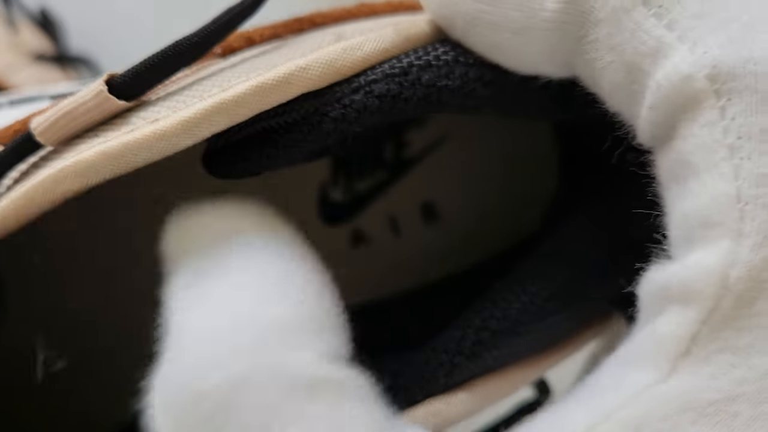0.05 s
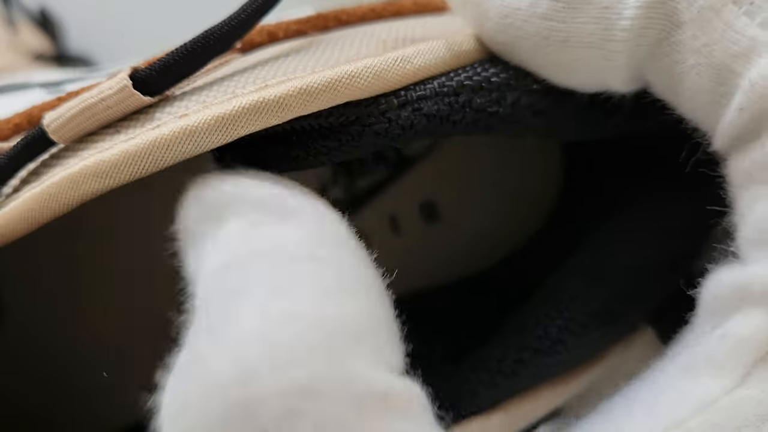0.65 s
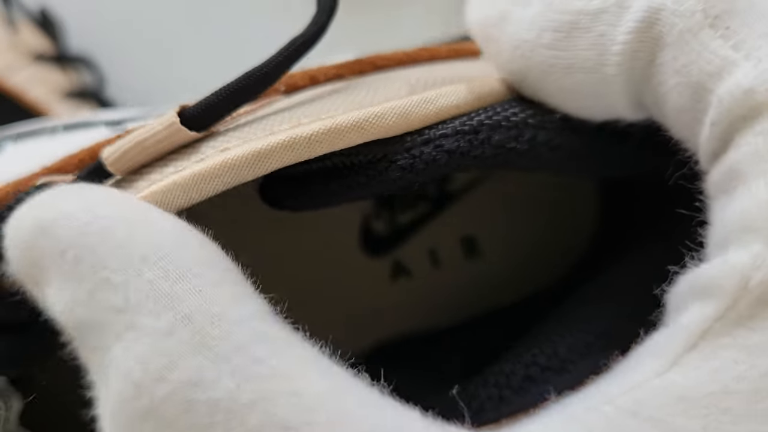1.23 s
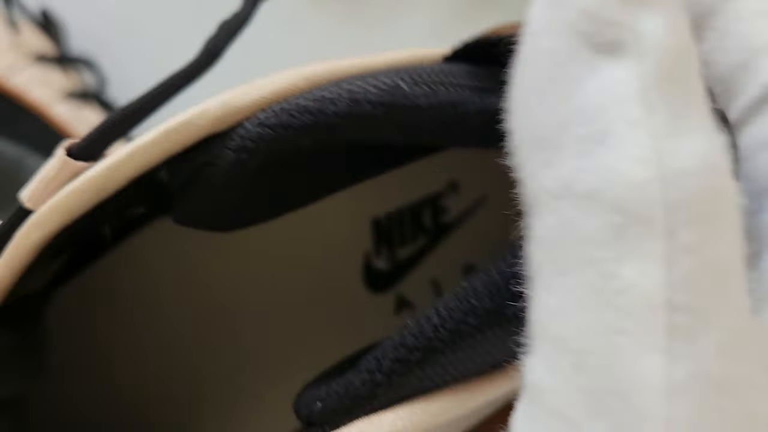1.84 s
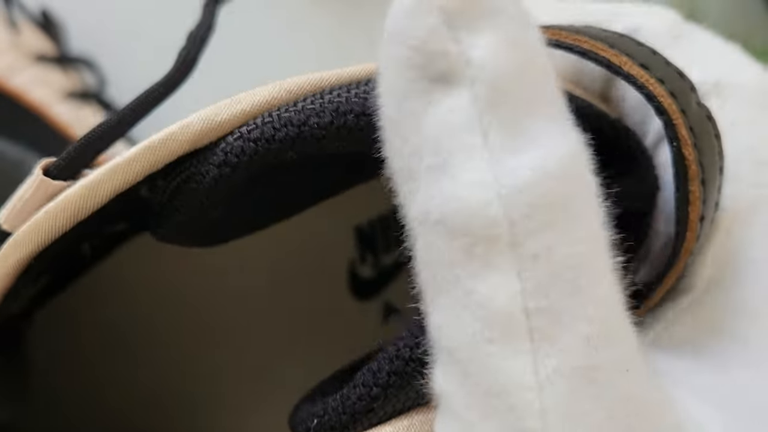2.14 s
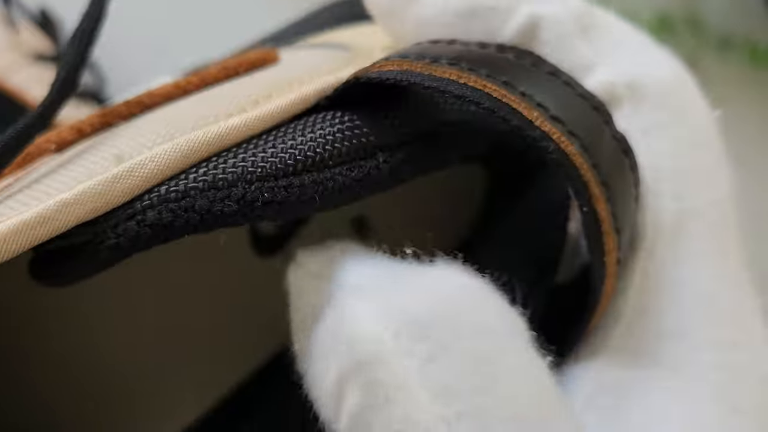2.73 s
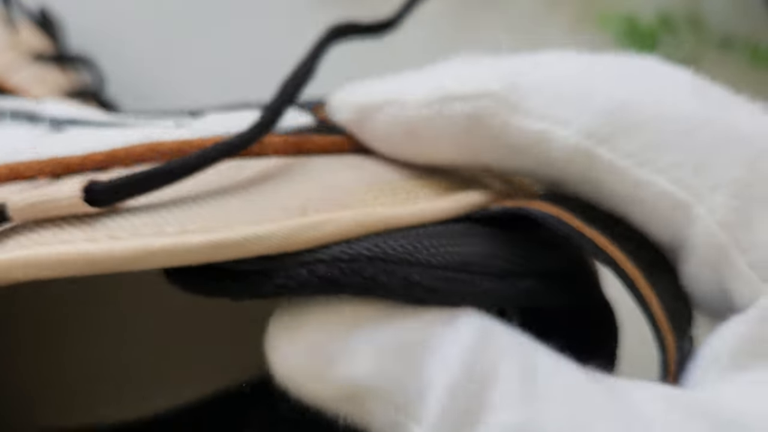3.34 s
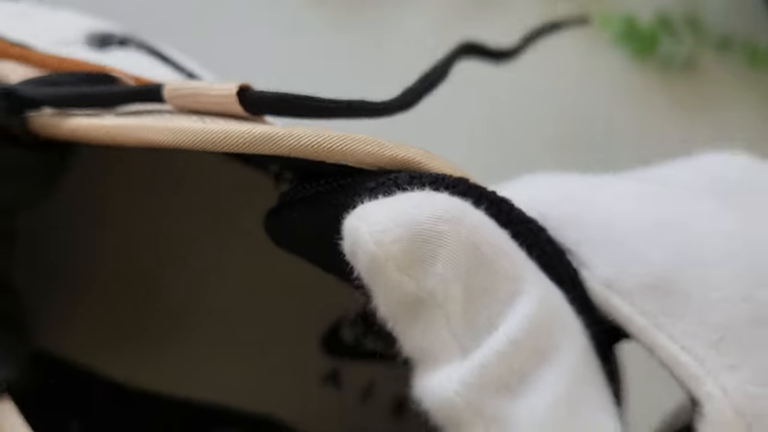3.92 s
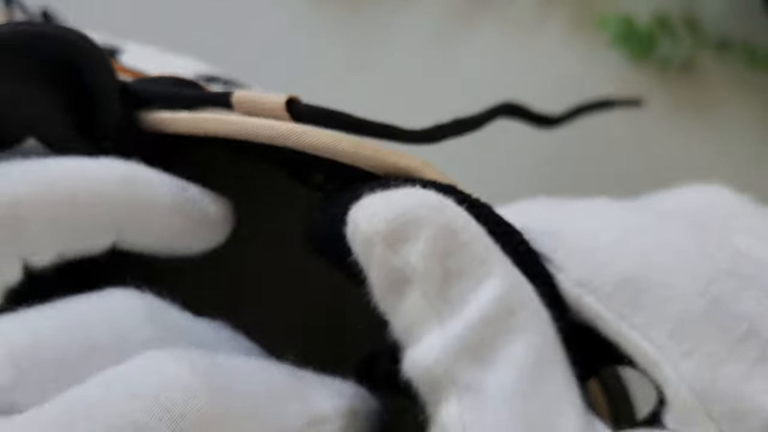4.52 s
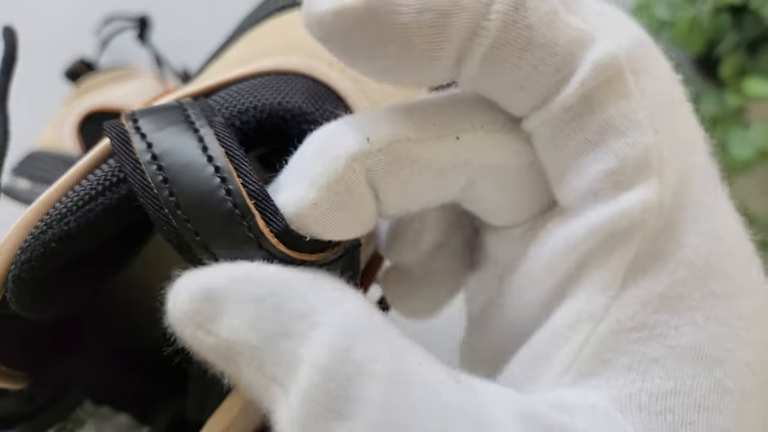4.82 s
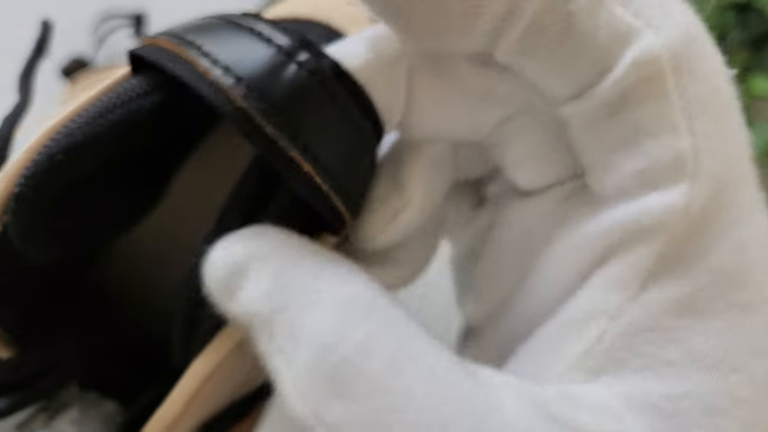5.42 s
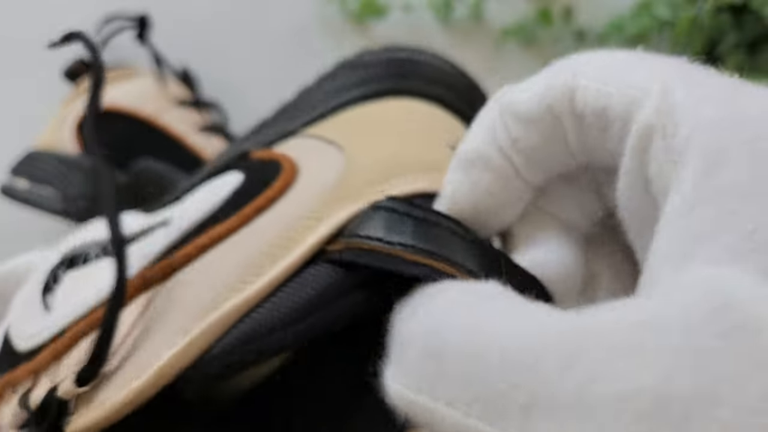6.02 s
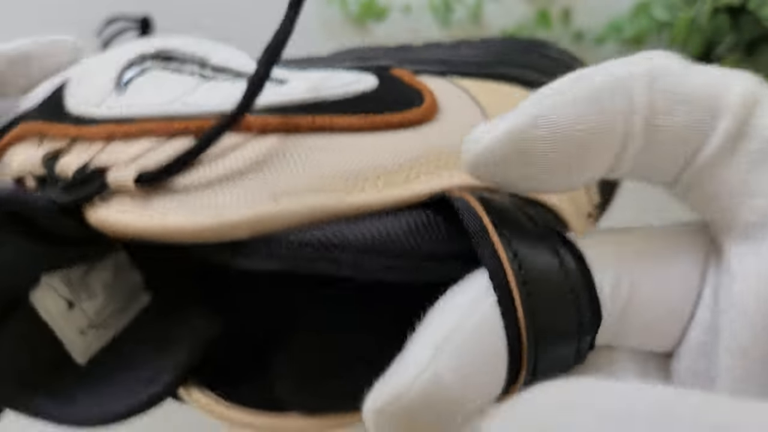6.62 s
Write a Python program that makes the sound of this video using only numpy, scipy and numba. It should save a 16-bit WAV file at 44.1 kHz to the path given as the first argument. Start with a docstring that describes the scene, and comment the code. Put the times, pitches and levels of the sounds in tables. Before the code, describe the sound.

Cotton gloves handle a sneaker close to the microphone in a small quiet room. At about 0.1, 0.7 and 1.1 seconds the thumb flicks the collar, each time a quick cloth swish with a short hollow knock; these are the loudest sounds. From 1.4 seconds the glove softly rubs the padded lining, with tiny creaks around 1.6 and brief brushing strokes around 2. A soft low thump comes at 1.9, and lighter swishing knocks at 2.8 and 3.2 seconds. From 3.6 to 4.5 seconds the rubbing is more continuous, with little runs of stick-slip creaking, ending in one more flick and knock at 4.6. From 4.9 to about 6.7 seconds faint, short strokes brush the outer fabric and heel loop, the last a little stronger. Everything sits slightly to the left, over a faint, steady low room noise.

```python
"""Cotton gloves handle a sneaker, close up, in a quiet room.
0-1.1 s: the thumb flicks the collar three times; the shoe knocks hollowly.
1.4-3.5 s: the glove rubs the padded lining and creaks in small slips; more knocks, brief strokes.
3.6-4.6 s: longer rubbing and stick-slip creaking, then a last flick.
4.9-6.7 s: short strokes brush the outer fabric and the heel loop."""
import sys
import numpy as np
from scipy import signal
from scipy.fft import rfft, irfft
from scipy.io import wavfile
from scipy.ndimage import uniform_filter1d
from numba import njit

SR = 44100
rng = np.random.default_rng(int(sys.argv[2]) if len(sys.argv) > 2 else 0)


def inscribe(sig):
    """Save sig as 16-bit PCM at rate SR to the path in sys.argv[1].

    A 1-D sig is mono; a 2-D sig holds one channel per row.
    Samples are clipped to [-1, 1] before scaling.
    """
    pcm = np.round(np.clip(np.atleast_2d(sig).T, -1, 1) * 32767)
    wavfile.write(sys.argv[1], SR, pcm.astype(np.int16))


N = 293706
T = np.arange(N) / SR

# thumb flicks: t/s, hollow/dB, wall f/Hz, wall/dB, sole f/Hz, sole/dB, damping factor, room send/dB
THUMB_FLICKS = [(0.1329, -20.5, 207, -12, 126, -52, 1.11, -9), (.658, -18, 197, -9, 111, -19.5, 1.16, -8.5),
                (1.0816, -15, 223, -19, 90, -21.5, 0.93, -6.5),
                (1.9021, -64.5, 217, -33, 69.6, -29.5, 0.84, -6),
                (2.8325, -27, 287, -26, 101, -22, 1.3, -8.5), (3.2323, -33.5, 301, -29, 83, -25.5, 0.7, -5),
                (4.6066, -27.5, 167, -25.5, 146, -40, 2.07, -40.5),
                (4.6136, -23, 190, -49, 142, -61, 3.2, -45.5)]
# cloth whipping off an edge: t/s, level/dB
EDGE_SWISHES = [(0.134, -44.5), (.5, -67), (0.656, -39), (1.08, -43), (1.325, -70), (1.906, -64),
                (2.827, -38.5), (3.042, -61), (3.227, -43), (4.609, -46.5)]
# runs of slips on the padding: start/s, length/s, slip peak/dB
CREAK_RUNS = [(1.417, .045, -54), (1.594, .006, -44.5), (1.633, .015, -40), (2.134, .006, -45.5),
              (3.628, .015, -49), (3.747, .025, -43.5), (3.802, .006, -44), (3.823, .036, -41.5),
              (3.898, .006, -49.5), (3.928, .006, -48), (4.07, .025, -46.5), (4.121, .006, -44),
              (4.167, .046, -52), (4.27, .025, -47), (4.731, .006, -55.5)]
# drags over the lining: start/s, end/s, hiss/dB, hollow/dB
LINING_DRAGS = [(-.05, 0.13, -66.5, -57), (1.491, 1.811, -60.5, -54.5), (1.952, 2.149, -81, -66.5),
                (2.58, 2.77, -69, -63.5), (3.6, 3.728, -64, -60), (3.716, 3.963, -70, -60),
                (3.952, 4.134, -60.5, -56), (4.142, 4.25, -62.5, -61.5), (4.258, 4.46, -63, -58.5),
                (4.479, 4.527, -54.5, -53), (6.46, 6.683, -68.5, -65)]
# thumb bearing down on the mesh: t/s, half length/s, level/dB
MESH_PRESSES = [(0.04, 0.099, -68), (1.621, 0.16, -70), (1.723, 0.019, -56.5), (4.003, .04, -58),
                (6.555, 0.015, -65.5)]
# strokes over the outside: start/s, end/s, level/dB, swell/dB, weave f/Hz, weave re hiss/dB
OUTER_STROKES = [(1.822, 1.91, -54.5, 9.5, 3830, -10), (1.937, 1.984, -64, 11, 4300, 0.5),
                 (1.998, 2.11, -67, 10, 4260, -3.5), (2.108, 2.137, -54.5, 5, 3530, 0),
                 (2.821, 2.817, -43, 4, 7460, 8), (3.334, 3.453, -53.5, 6, 3830, -10.5),
                 (3.451, 3.605, -61.5, -4, 3850, -9), (4.067, 4.097, -56.5, 3.5, 2520, -10),
                 (4.358, 4.39, -75.5, 4, 5300, 8.5), (4.937, 5.026, -59.5, -3.5, 3010, -7.5),
                 (5.264, 5.334, -63.5, -7, 2850, -14), (5.33, 5.478, -66.5, 11, 3094, -16),
                 (5.49, 5.549, -58, 1, 3300, -7.5), (5.677, 5.797, -64.5, 8, 4100, -7.5),
                 (5.809, 5.859, -61, 4, 4950, -2.5), (5.92, 5.96, -68.5, -5.5, 5760, -2.5),
                 (5.997, 6.037, -63.5, 5, 2110, -9.5), (6.056, 6.116, -66.5, -9.5, 4860, -5.5),
                 (6.156, 6.236, -69.5, -1.5, 3910, 1.5), (6.245, 6.289, -67, -4, 2200, 0),
                 (6.32, 6.398, -60, -5.5, 3040, -10.5), (6.469, 6.634, -70, -5, 4280, -1.5),
                 (6.62, 6.686, -55.5, 17, 4200, -4.5)]
# shifts of the holding hand: start/s, end/s, level/dB
HOLD_SHIFTS = [(1.472, 2.15, -73.5), (2.283, 2.8, -81.5), (3.28, 3.36, -69.5), (5.013, 5.25, -78.5),
               (5.57, 6.66, -73.5)]

# modes of the shoe and the room: f/Hz, level/dB, t60/s
SHOE_MODES = [(290, -8, .045), (403, -4, .05), (472.4, 3.5, 0.041), (547.7, 3.5, 0.026),
              (824, -11.5, 0.032), (978, -12, 0.015), (1865, -23.5, 0.02), (2480, -25.5, 0.013),
              (2836, -25, 0.013)]
LOW_ROOM_MODES = [(234, -32.5, .42), (322, -23.5, .66), (425.6, -16, 0.45), (471, -19.5, 0.3),
                  (530, -31, 0.31), (586, -23.5, 0.3), (610, -15.5, 0.33), (838, -31, 0.34)]

# noise spectra: f/Hz, level/dB
SWISH_SPECTRUM = [(200, 9), (500, 15), (750, 6.5), (1100, 5), (1700, -1.5), (2700, 1), (5000, -6),
                  (7500, -4.5), (10000, -9.5), (16000, -8.5)]
NAP_SPECTRUM = [(900, -44), (1600, 1.5), (2200, 0.5), (4000, -2.5), (6000, -2), (9000, -2), (15800, -4.5)]
HOLLOW_SPECTRUM = [(80, -25), (200, -3.5), (320, -2), (420, 0.5), (550, 0.5), (700, -4), (1000, -58),
                   (2000, -57)]
MESH_SPECTRUM = [(400, -33), (750, 5), (1150, 5), (1550, -2), (2600, -29.5)]
CLOTH_SPECTRUM = [(150, 0), (300, -4.5), (520, 8), (800, -4), (1300, -5.5), (1800, -7.5), (3200, -1.5),
                  (5500, -2), (8500, -3.5), (10000, -7.5), (14000, -6.5), (16000, -12.5)]
REVERB_SPECTRUM = [(60, -22), (150, -11), (260, -5.5), (340, -1), (600, -7), (800, -7.5), (2000, -8.5),
                   (6000, -14), (15000, -15)]
AIR_SPECTRUM = [(25, -1.5), (80, -4), (118, -11.5), (150, -2), (200, -15.5), (500, -16), (900, -28),
                (1150, -24.5), (1700, -33), (2300, -30.5), (8500, -41.5), (10000, -48), (12600, -36),
                (16000, -37.5)]
# likeness of the two ears: f/Hz, correlation
EAR_CORRELATION = [(100, 0.89), (350, 0.78), (700, 0.8), (1400, 0.14), (2800, 0.018)]


def flicks():
    """Each flick rings hollow, wall, sole and room modes; returns the sound and a reverb send."""
    direct, send = np.zeros((2, N))
    standing = standing_waves()
    for at_s, db, wall_hz, wall_db, sole_hz, sole_db, damping, room_db in THUMB_FLICKS:
        hollow = undb(db) * knock(damping, attack_s=.00032, detune=.016)
        wall = undb(wall_db) * ring(wall_hz, t60_s=.032 / damping, attack_s=.0012)
        sole = undb(sole_db) * ring(sole_hz, t60_s=.052, attack_s=.0054)
        soft_noise = uniform_filter1d(rng.standard_normal(SR // 2), size=3)
        fingertip = undb(db - 23.5) * soft_noise * np.exp(-T[:SR // 2] / .0012)
        shoe = hollow + wall + sole
        add(direct, at_s, fingertip + shoe + undb(db + room_db) * standing)
        add(send, at_s, shoe * undb(room_db))
    return to_the_left(direct, db=2.6, lag_s=.00008), send


def knock(damping, attack_s, detune):
    """Shoe modes, slightly different at each spot; neighbours swing in opposite senses."""
    return sum((-1) ** k * undb(db)
               * ring(hz * (1 + detune * rng.standard_normal()), t60_s / damping, attack_s)
               for k, (hz, db, t60_s) in enumerate(SHOE_MODES))


def swishes(rise_s=.011, fall_s=.011):
    """The glove speeds over an edge, hissing harder until it lets go."""
    level = sum(undb(db) * np.exp(-np.maximum((at_s - T) / rise_s, (T - at_s) / fall_s))
                for at_s, db in EDGE_SWISHES)
    return level * pan(1.5) * colour(fibres(spread_db=8), SWISH_SPECTRUM)


def creaks(gap_s=.0103, jitter=.04, scatter_db=1.5):
    """Stick-slip at nearly even steps rings the shoe, damped by the gripping hand."""
    out = np.zeros(N)
    wall = undb(-1.5) * ring(196, t60_s=.018, attack_s=.001)
    slips = [knock(damping=1.17, attack_s=.00015, detune=.095) + wall for _ in range(8)]
    for start_s, length_s, db in CREAK_RUNS:
        at_s = start_s
        for slip, (late, hard) in zip(slips, rng.standard_normal((len(slips), 2))):
            if at_s <= start_s + length_s:
                add(out, at_s, undb(db + scatter_db * hard) * slip / np.abs(slip).max())
            at_s += gap_s * np.exp(jitter * late)
    return out * pan(2.6)


def lining(arch_db=3, mesh_db=-6):
    """Cotton drags on the padding: the nap hisses, coarse catches stir the hollow, the mesh scrapes."""
    nap, stir = np.zeros((2, N))
    for start_s, end_s, hiss_db, hollow_db in LINING_DRAGS:
        off_middle = np.clip((2 * T - start_s - end_s) / (end_s - start_s), -1, 1)
        effort = contact(start_s, end_s, edge_s=.024) * undb(-arch_db * off_middle ** 2)
        nap += undb(hiss_db) * effort
        stir += undb(hollow_db) * effort
    thumb = sum(undb(db) * np.exp(-((T - at_s) / half_s) ** 2) for at_s, half_s, db in MESH_PRESSES)
    press = undb(mesh_db) * nap + thumb
    hiss = nap * undb(2 * walk(70)) * glove_gap(colour(fibres(3), NAP_SPECTRUM), hz=4270, mix=.23)
    hollow = stir * undb(1.6 * walk(130)) * glove_gap(colour(fibres(7), HOLLOW_SPECTRUM), hz=454, mix=.51)
    scrape = press * undb(walk(120)) * glove_gap(colour(fibres(4.5), MESH_SPECTRUM), hz=1085, mix=.11)
    return (hiss + hollow + scrape) * pan(1)


def glove_gap(x, hz, mix, wander_oct=.3):
    """The gap between glove and shoe favours a band that shifts as the fingers move."""
    centre_hz = np.clip(hz * 2 ** (wander_oct * walk(11)), 300, SR / 4)
    band = unit(np.array([resonate(side, centre_hz, width=.13) for side in x]))
    return unit(x + mix * band)


def brush(arch_db=2, weave_width=.4, hand_reflection=.22):
    """Cotton slides over the outer fabric; the ribs of the weave sing higher with speed."""
    cloth = colour(fibres(spread_db=3), CLOTH_SPECTRUM)
    ribs = fibres(spread_db=7) * snags()
    speed = 1 + .07 * walk(35)
    grip = unit(undb(.41 * walk(65) + .55 * walk(900)) * snags())
    sizzle = signal.sosfiltfilt(signal.butter(3, 8500, "high", fs=SR, output="sos"), cloth)
    out = np.zeros((2, N))
    for start_s, end_s, db, swell_db, weave_hz, weave_db in OUTER_STROKES:
        near = (T > start_s - .04) & (T < end_s + .04)
        pitch_hz = np.clip(weave_hz * speed[near], 500, SR / 4)
        weave = unit(np.array([resonate(resonate(side, pitch_hz, weave_width), pitch_hz, weave_width)
                               for side in ribs[:, near]]))
        lag_samples = int(SR * rng.uniform(.0003, .0011))
        hiss = unit(cloth[:, near] + hand_reflection * np.roll(cloth[:, near], lag_samples, axis=1))
        hiss -= np.clip((-65.5 - db) / 14, 0, .4) * sizzle[:, near]  # a light touch is duller
        along = np.interp(T[near], [start_s, end_s], [-1, 1])
        contour_db = db + swell_db * along / 2 + arch_db * (.5 - along ** 2)
        level = (contact(start_s, end_s, edge_s=.011) * grip)[near] * undb(contour_db)
        out[:, near] += level * (pan(5) * hiss + pan(10.5) * undb(weave_db) * weave)
    return out


def snags(rate_hz=45, decay_s=.0044, max_db=-3.5):
    """Friction gain: threads snag at random, each a brief burst."""
    onsets = (rng.random(N) < rate_hz / SR) * rng.random(N)
    return 1 + undb(max_db) * signal.lfilter([1], [1, -np.exp(-1 / (decay_s * SR))], onsets)


def holding(wander_db=2.5):
    """The holding hand shifts: a faint rustle that comes and goes."""
    level = sum(undb(db) * contact(start_s, end_s, edge_s=.019) for start_s, end_s, db in HOLD_SHIFTS)
    return level * undb(wander_db * walk(18)) * colour(fibres(spread_db=2.5), CLOTH_SPECTRUM) * pan(7.5)


def cupped_hand(x, echo_db=-6, decay_s=.00096):
    """Quick reflections between hand and shoe put fine peaks and dips into the treble."""
    t = T[:SR // 100]
    burst = rng.standard_normal((2, len(t))) * np.exp(-t / decay_s)
    echoes = signal.sosfilt(signal.butter(2, 1000, "high", fs=SR, output="sos"), burst)
    echoes = np.pad(undb(echo_db) * unit(echoes) / np.sqrt(len(t)), ((0, 0), (SR // 3000, 0)))
    return x + signal.fftconvolve(x, echoes, axes=1)[:, :N]


def standing_waves():
    """The room's low modes after one push."""
    return sum(undb(db) * ring(hz, t60_s, attack_s=.016) for hz, db, t60_s in LOW_ROOM_MODES)


def reverb(x, t60_s=.43):
    """Diffuse tail of a small room, strongest in the low middle range."""
    envelope = np.exp(-np.log(1000) * T / t60_s) * np.clip((T - .006) / .0032, 0, 1)
    response = colour(rng.standard_normal((2, N)), REVERB_SPECTRUM) * envelope
    return signal.fftconvolve(x[None], unit(response) / np.sqrt(N), axes=1)[:, :N]


def air(level_db=-65):
    """Steady low room noise with a faint hiss."""
    return undb(level_db + .51 * walk(3.7)) * colour(rng.standard_normal((2, N)), AIR_SPECTRUM) * pan(.75)


def ring(hz, t60_s, attack_s):
    """One damped mode building up under a soft push."""
    t = T[:SR // 2]
    return np.cos(2 * np.pi * hz * t) * np.exp(-np.log(1000) * t / t60_s) * (1 - np.exp(-t / attack_s))


def fibres(spread_db):
    """Countless fibres catch and let go, a few much harder than the rest."""
    return rng.standard_normal((2, N)) * undb(spread_db * rng.standard_normal(N))


def contact(start_s, end_s, edge_s):
    """Touch down, hold, lift off."""
    return (1 + np.tanh((T - start_s) / edge_s)) * (1 + np.tanh((end_s - T) / edge_s)) / 4


@njit
def resonate(x, hz, width):
    """Band-pass with a moving centre; width = 1/Q."""
    y, band, low = np.empty(len(x)), 0., 0.
    for i in range(len(x)):
        g = np.tan(np.pi * hz[i] / SR)
        y[i] = (band + g * (x[i] - low)) / (1 + g * (g + width))
        band, low = 2 * y[i] - band, low + 2 * g * y[i]
    return y


def colour(x, spectrum):
    """Shape two unrelated noises; the ears share the bass but not the treble."""
    alike = np.clip(on_bins(EAR_CORRELATION), -1, 1)
    mid, side = rfft(x) * undb(on_bins(spectrum)) * np.sqrt([1 + alike, 1 - alike])
    return unit(irfft(np.array([mid + side, mid - side]), N))


def on_bins(points):
    """Join (f/Hz, value) points on a log-frequency axis."""
    hz, value = np.transpose(points)
    return np.interp(np.log(np.fft.rfftfreq(N, 1 / SR) + 1), np.log(hz), value)


def walk(rate_hz):
    """Smooth random wander, rms 1."""
    step = max(int(SR / rate_hz), 1)
    return unit(uniform_filter1d(np.repeat(rng.standard_normal(N // step + 1), step), step)[:N])


def to_the_left(x, db, lag_s):
    """Louder in the left ear, later in the right."""
    return np.array([x, np.interp(T - lag_s, T, x)]) * pan(db)


def pan(db):
    """Stereo gains; db = left minus right."""
    return undb(np.array([[1], [-1]]) * db / 2)


def add(out, at_s, x):
    """Mix in a short sound."""
    i = int(at_s * SR)
    out[..., i:i + x.shape[-1]] += x[..., :N - i]


def undb(db):
    """Decibels to gain."""
    return 10 ** (np.asarray(db) / 20)


def unit(x):
    """Scale to rms 1."""
    return x / np.sqrt(np.mean(x ** 2))


def scene():
    """Knocks and cloth close by, the room behind them."""
    knocks, knock_send = flicks()
    inside = creaks() + lining()
    room_ring = undb(-48.5) * signal.fftconvolve(inside[0], standing_waves())[:N]
    cloth = cupped_hand(swishes()) + inside + brush() + holding()
    room_tail = reverb(undb(-15) * knock_send + undb(-21) * cloth[0])
    return knocks + cloth + (room_ring + room_tail) * pan(1.2) + air()


def record(dry, low_hz=42, top_hz=15900):
    """Rumble filter and steep top cut."""
    x = signal.sosfilt(signal.butter(2, low_hz, "high", fs=SR, output="sos"), dry)
    return signal.sosfilt(signal.ellip(10, .2, 70, top_hz, fs=SR, output="sos"), x)


dry = scene()
out = record(dry)
inscribe(out)
```